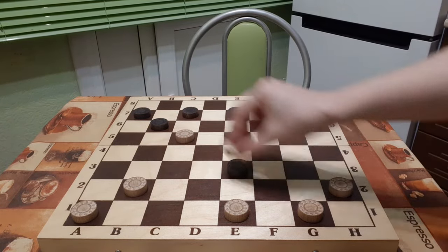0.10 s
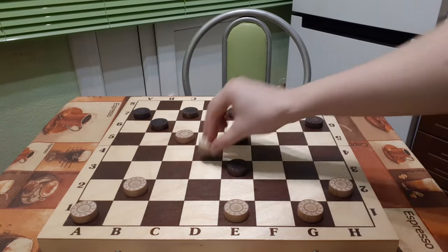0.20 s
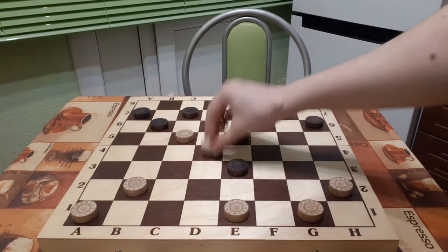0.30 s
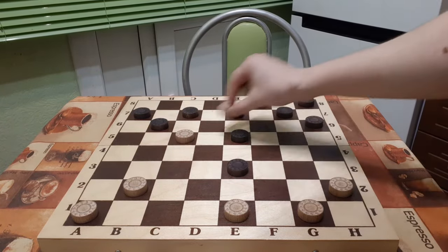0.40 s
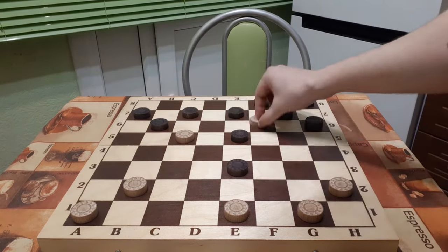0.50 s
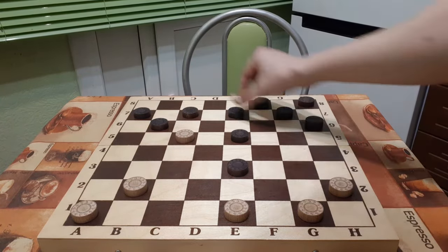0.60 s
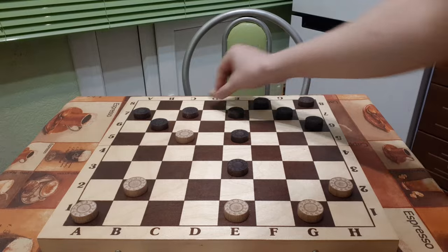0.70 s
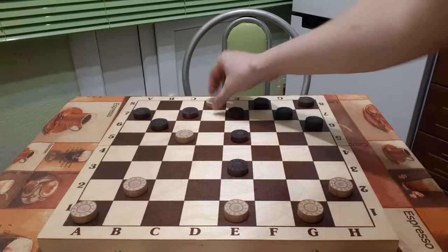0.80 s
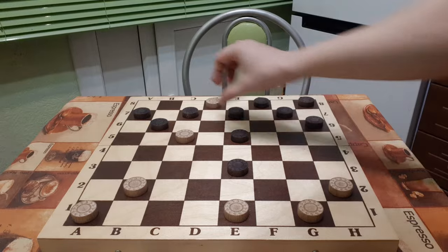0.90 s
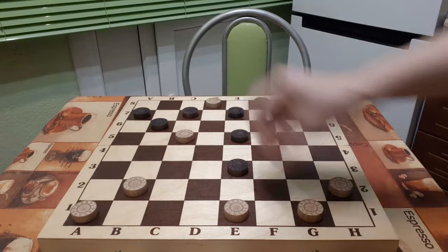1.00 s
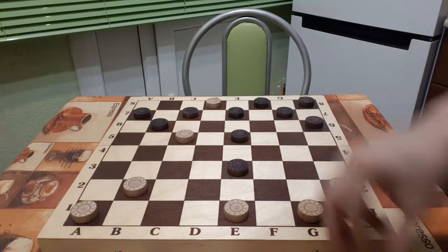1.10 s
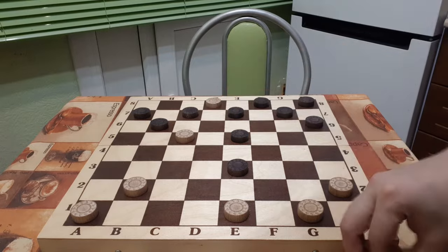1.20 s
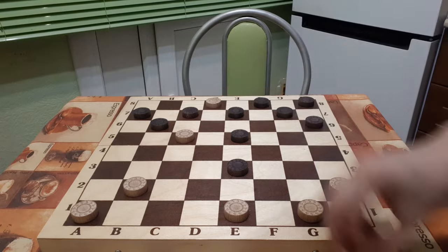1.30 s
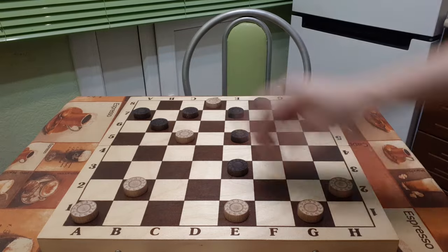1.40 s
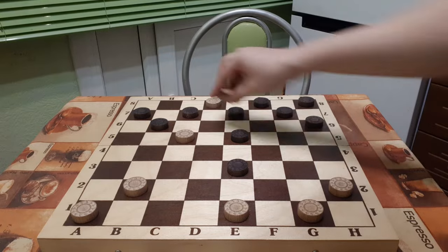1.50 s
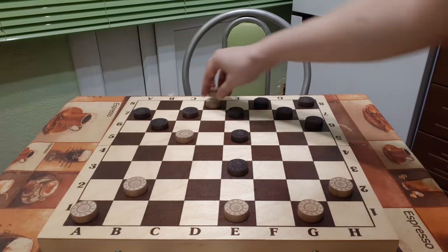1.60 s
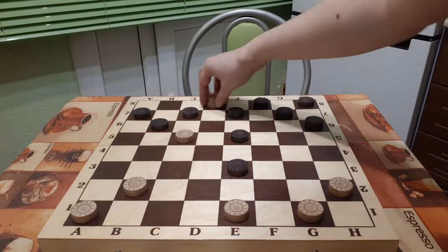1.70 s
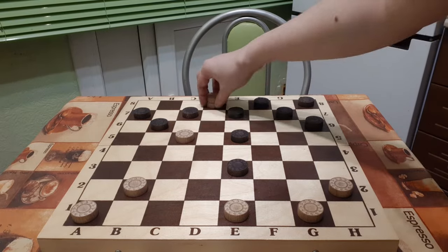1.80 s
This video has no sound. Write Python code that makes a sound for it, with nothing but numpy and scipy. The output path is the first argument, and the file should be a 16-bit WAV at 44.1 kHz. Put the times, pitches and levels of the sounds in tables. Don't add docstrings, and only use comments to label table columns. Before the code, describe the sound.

Wooden draughts pieces slap a hollow board: a softer double tap at the start, three sharp clacks about a quarter second apart, then near quiet and a faint settling tap, close stereo microphone in a small echoing kitchen.

```python
import sys
import numpy as np
from scipy import signal
from scipy.fft import rfft, irfft
from scipy.io import wavfile

SR = 44100
rng = np.random.default_rng(int(sys.argv[2]) if len(sys.argv) > 2 else 0)


def waveform_to_disk(signal):
    frames = np.transpose(np.atleast_2d(signal))
    scaled = np.clip(frames, -1, 1) * 32767
    samples = np.round(scaled).astype(np.int16)
    wavfile.write(sys.argv[1], SR, samples)


def voltage_ratio(level):
    return 10 ** (np.asarray(level, float) / 20)


N = 83790
LEAD_S = 0.1
ALIKE_HZ = 430.6
LEFT_RIGHT = np.array([[1], [-1]])


def decay(t, t60):
    return np.exp(-np.log(1000) * t / t60)


def ring(hz, t60, size):
    t = np.arange(size) / SR
    return np.sin(2 * np.pi * hz * t) * decay(t, t60)


def band(x, hz, width_hz):
    b, a = signal.iirpeak(min(hz, 0.45 * SR), hz / width_hz, fs=SR)
    return signal.lfilter(b, a, x)


def add(out, x, s):
    i = int((s + LEAD_S) * SR)
    n = min(x.shape[-1], out.shape[-1] - i)
    out[..., i:i + n] += x[..., :n]


def pair(hz, size):
    mid, side = rng.standard_normal((2, size))
    share = hz ** 2 / (hz ** 2 + ALIKE_HZ ** 2)
    return (mid + share * side * LEFT_RIGHT) / np.sqrt(1 + share ** 2)


def contact(crack_db, hz, ring_db, knock_db, bright_hz, knock_hz):
    t = np.arange(1024) / SR
    click = 1.0 * (t == 0)
    burst = rng.standard_normal(len(t)) * np.exp(-t / 0.0007)

    soften = signal.butter(2, min(bright_hz, 0.45 * SR), fs=SR)
    cracks = np.diff([burst / 2, 2 * click], prepend=0)
    near_crack, far_crack = voltage_ratio(crack_db) * signal.lfilter(*soften, cracks)

    def tone(t60):
        overtone = ring(hz * 1.5, t60 / 2, len(t))
        return voltage_ratio(ring_db) / 2 * (ring(hz, t60, len(t)) + overtone)

    width_hz = 570
    knock = band(band(click, knock_hz, width_hz), knock_hz, width_hz * 2)
    knock = 20 * voltage_ratio(knock_db) * knock
    near = near_crack + tone(0.006) + voltage_ratio(-16) * knock
    far = far_crack + 2 * tone(0.0018) + knock
    return near, far


# t/s, crack level/dB, ring f/Hz, ring level/dB, knock level/dB
MOVE_CONTACTS = [
    [(-.04, -11.5, 6200, -20.5, -5), (-.03, -11, 3100, -16.5, -6)],
    [(.2482, 4, 4810, 1, -13.5), (.2510, -39, 3560, -2, -8.5), (.2519, 3.5, 5350, -32, -5.5)],
    [(.4962, -18, 2120, -13.5, -7), (.4983, 8.5, 3330, -4, -11.5), (.5026, -1.5, 6640, -2.5, -22),
     (.5085, -27, 4280, -5.5, -5.5), (.5115, -33, 6400, -34, -6.5), (.5142, 5, 4697, -7, -25.5)],
    [(.7611, -6, 2159, -9, -23.5), (.7651, -2.5, 3184, -5.5, -16), (.7655, -16, 7717, -6.5, -11),
     (.7660, -14.5, 4680, -4.5, -18)],
    [(1.18, -77.5, 4500, -67, -74.5), (1.2055, -62, 3750, -56, -72), (1.2158, -54, 4270, -42.5, -44),
     (1.2168, -56, 4910, -44, -68.5), (1.2305, -69, 5086, -53, -57)],
    [(1.6886, -46, 1920, -25, -30.5), (1.6917, -38, 4543, -28, -32.5), (1.696, -45, 3590, -28.5, -39.5),
     (1.712, -53, 2945, -31.5, -25)],
]
# echo level/dB, left-right level/dB, crack brightness f/Hz, knock f/Hz, left lag t/ms
MOVE_PLACES = [(-11, -1, 4560, 444, .03), (-4.5, -0.5, 9600, 835, .03), (-3.5, -0.9, 8200, 645, .04),
               (-5, -0.45, 8400, 900, -.03), (-1.5, 0, 1560, 390, .03), (3, 0, 7400, 644, .03)]


def pieces(size):
    out = np.zeros((2, size))
    for contacts, place in zip(MOVE_CONTACTS, MOVE_PLACES):
        echo_db, pan_db, bright_hz, knock_hz, lag_ms = place
        pan = voltage_ratio(pan_db * LEFT_RIGHT / 2)
        for s, crack_db, hz, ring_db, knock_db in contacts:
            near, far = contact(crack_db, hz, ring_db, knock_db, bright_hz, knock_hz)
            heard = voltage_ratio(echo_db) * signal.fftconvolve(far[None], room(), axes=1)
            right = np.roll(near, 5)
            left = np.roll(right, round(lag_ms * SR / 1000))
            heard[:, :len(near)] += voltage_ratio(3) * np.array([left, right])
            add(out, heard * pan, s)
    return out


# t/s, level/dB
SINGS = [(.765, -25), (.766, -26.5), (.499, -21), (1.69, -38), (.249, -28.5), (-.03, -16), (.505, -14),
         (.763, -21.5), (.765, -27), (1.216, -76)]
SING_HZ = [3100, 6130, 2100, 1780, 4150, 620, 490, 595, 4400, 5200]


def singing_wood(size):
    out = np.zeros((2, size))
    for hz, (s, db) in zip(SING_HZ, SINGS):
        note = ring(hz, 0.025, 2048)
        add(out, voltage_ratio(db) * signal.fftconvolve(note[None], room(), axes=1), s)
    return out


# f/Hz, t60/s
BOARD_MODES = [(136, 0.31), (196, 0.25), (250, .1), (295, 0.1)]
# t/s, then the level/dB of each mode
BOOMS = [(-.03, -35.5, -26, -58, -55), (0.138, -63.5, -67, -50, -42), (.249, -34.5, -22, -14, -20),
         (0.499, -28.5, -20.5, -18, -55), (0.764, -46, -30, -27, -34), (1.216, -53, -61.5, -48, -46),
         (1.693, -60, -44, -41.5, -31.5), (1.785, -61.5, -57.5, -44.5, -39), (1.873, -67, -64.5, -53, -51)]


def board(size):
    out = np.zeros((2, size))
    t = np.arange(SR // 2) / SR
    swell = 1 - np.exp(-(t / 0.005) ** 2)
    for s, *levels in BOOMS:
        tune = 1 + 0.004 * rng.standard_normal(len(BOARD_MODES))
        boom = np.zeros(len(t))
        for (hz, t60), db, k, sign in zip(BOARD_MODES, levels, tune, (1, -1, 1, -1)):
            boom += sign * voltage_ratio(db) * ring(hz * k, t60, len(t))
        add(out, np.array([boom * voltage_ratio(1), np.roll(boom, 4)]) * swell, s)
    return out


# t/s, level/dB
SHUDDERS = [(-.03, -43), (0.247, -36.5), (0.502, -43.5), (.762, -66), (1.215, -81), (1.69, -67)]


def table(size):
    out = np.zeros((2, size))
    t = np.arange(SR // 2) / SR
    rumble_hz = 49.94
    envelope = decay(t, 0.28) * (1 - np.exp(-t / 0.016))
    for s, db in SHUDDERS:
        rumble = band(pair(ALIKE_HZ / 2, len(t)), rumble_hz, rumble_hz)
        add(out, voltage_ratio(db) * 10 * rumble * envelope, s)
    return out


# f/Hz, t60/s, level/dB
ROOM_ECHO = [(247, 0.34, -2), (592.4, 0.3, -15.5), (1111, .33, -7), (2500, 0.33, -1), (5233, 0.27, 6.5),
             (8300, .25, -3), (11137, 0.14, -4), (15320, 0.25, -6)]


def room():
    t = np.arange(SR * 9 // 20) / SR
    hz, t60, db = np.array(ROOM_ECHO).T
    build_s, sparse_s = 0.0019, 0.0043

    lumps = np.repeat(rng.standard_normal((2, len(t) // 40 + 1)), 40, axis=1)[:, :len(t)]
    lumps = voltage_ratio(4.6 * np.exp(-t / sparse_s / 2) * lumps)
    out = np.zeros((2, len(t)))
    for f in 250 * 2 ** (np.arange(13) / 2):
        fade = decay(t, np.interp(np.log(f), np.log(hz), t60))
        level = voltage_ratio(np.interp(np.log(f), np.log(hz), db))
        noise = band(band(lumps * pair(f, len(t)), f, f / 2), f, f / 2)
        out += level * fade * band(noise, f, f)
    return out * (1 - np.exp(-t / build_s)) * voltage_ratio(6) / 20


# f/Hz, level/dB per Hz
AIR = [(15, -52), (25, -38.5), (70, -18.5), (92, -1), (125, -13.5), (162, 10), (179, -13.5), (305, -4),
       (1500, -42.5), (1950, -76.5), (3300, -120)]
# f/Hz, width/Hz, level/dB
FRIDGE_HUM = [(45.04, 33, -94), (99, 3.9, -77.5), (160.5, 8.8, -77), (250, 32, -79), (300.1, 14, -76)]


def kitchen(size):
    hz, db = np.array(AIR).T
    f = np.fft.rfftfreq(size, 1 / SR) + 1
    mid, side = rfft(rng.standard_normal((2, size)))
    share = f ** 2 / (f ** 2 + ALIKE_HZ ** 2)
    colour = voltage_ratio(np.interp(np.log(f), np.log(hz), db, right=-99))
    air = irfft((mid + share * side * LEFT_RIGHT) * colour, size)
    hiss = band(rng.standard_normal((2, size)), 5000, 14000)
    out = voltage_ratio(-70.5) * air / air.mean(0).std() + voltage_ratio(-88.5) * 2 * hiss
    for line_hz, width_hz, line_db in FRIDGE_HUM:
        line = band(band(pair(line_hz, size), line_hz, width_hz), line_hz, width_hz)
        out += voltage_ratio(line_db) * line / line.std()
    return out


def scene():
    size = N + int(LEAD_S * SR)
    bass_cut = signal.butter(4, 98, "high", fs=SR, output="sos")
    wood = signal.sosfilt(bass_cut, pieces(size) + singing_wood(size) + board(size))
    return (wood + table(size) + kitchen(size))[:, -N:]


def band_limit(x):
    return signal.sosfilt(signal.butter(12, 16600, fs=SR, output="sos"), x)


def record(dry):
    rounded = np.tanh(dry / 1.05) * 1.05
    treble_cut = signal.ellip(8, 0.2, 70, 16300, fs=SR, output="sos")
    mix = signal.sosfilt(treble_cut, rounded)
    return band_limit(mix)


dry = scene()
out = record(dry)
waveform_to_disk(out)
```